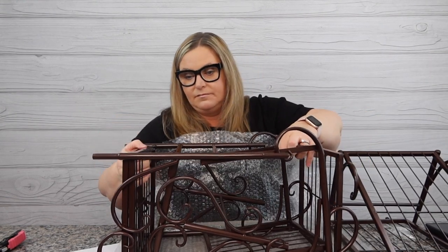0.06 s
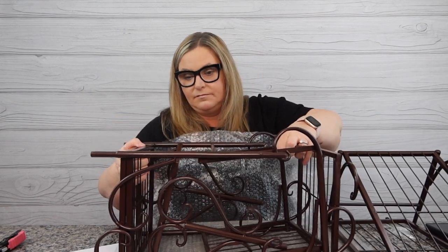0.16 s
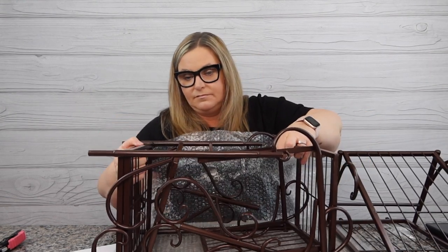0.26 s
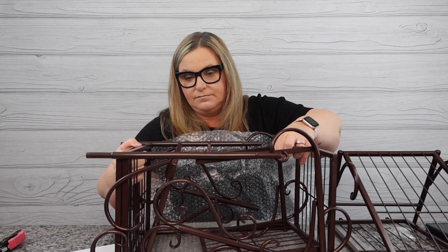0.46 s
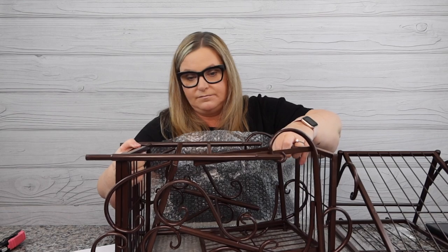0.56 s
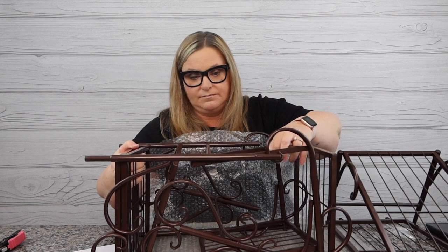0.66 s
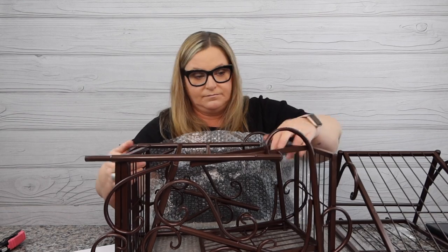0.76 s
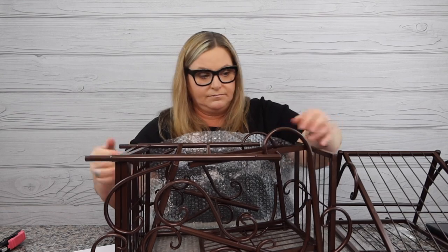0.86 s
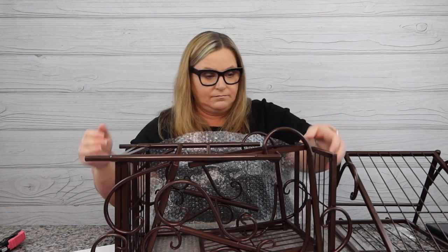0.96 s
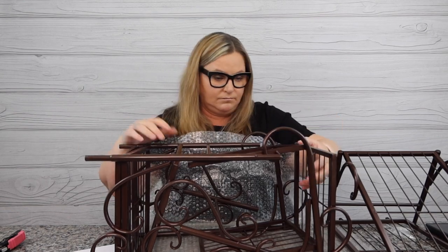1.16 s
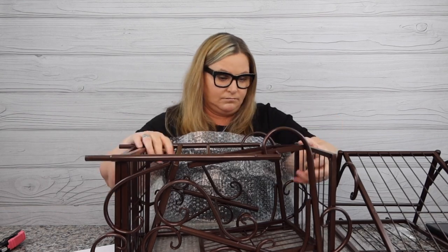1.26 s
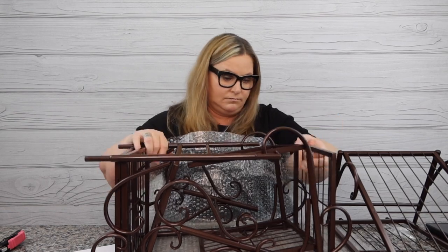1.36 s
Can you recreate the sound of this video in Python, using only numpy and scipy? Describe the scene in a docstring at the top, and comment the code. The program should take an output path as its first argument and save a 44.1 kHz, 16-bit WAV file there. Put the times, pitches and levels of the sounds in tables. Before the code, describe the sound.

A metal stand knocks on a table with two loud, quick clanks at about 0.2 and 0.3 seconds, over a soft thump and faint rustling. Its bars and wire shelves ring and fade by about one second. From 0.5 seconds to the end at 1.4, bubble wrap crinkles quietly with small sharp snaps, while fingers lightly tap the metal and brush the wires. The room sounds small.

```python
"""Two quick metal clanks ring on in a small room, followed by crinkling and ticking.
A welded steel stand is knocked on a table: its bars clank, its wire shelves sing on,
and the table thumps. Then hands shift on the frame, tapping it and brushing its wires,
while tiny creases give way in the bubble wrap inside it."""
import sys
import numpy as np
from scipy import signal
from scipy.fft import rfft, irfft
from scipy.io import wavfile

SR = 44100
rng = np.random.default_rng(int(sys.argv[2]) if len(sys.argv) > 2 else 0)


def inscribe(sig):
    """Save sig as 16-bit PCM at rate SR to the path in sys.argv[1].

    A 1-D sig is mono; a 2-D sig holds one channel per row.
    Samples are clipped to [-1, 1] before scaling.
    """
    pcm = np.round(np.clip(np.atleast_2d(sig).T, -1, 1) * 32767)
    wavfile.write(sys.argv[1], SR, pcm.astype(np.int16))


N = 61739
T = np.arange(N) / SR

# Blows on the frame; the first two merge into one knock. t60 is the time to fade by 60 dB.
# t/s, level/dB, treble limit/Hz, strong tones/dB,
# t60 of the extra fade that cuts a blow's ring short/s, wires/dB
BLOWS = [(0.2212, -12.5, 11700, -5, 0.65, -5.5), (0.2328, -16.5, 8000, -8.5, 0.61, -5.5),
         (0.2708, -8.5, 22000, -5.5, 9, -3)]
# how long the bars ring: f/Hz, t60/s
BAR_RING_TIMES = [(300, 0.4), (900, 0.49), (2300, 0.41), (4500, 0.38), (8000, 0.28), (12000, 0.21),
                  (16000, 0.15)]
BAR_BUILD_UP_CYCLES = 4.7


def amp(db):
    """Turns decibels into a gain."""
    return 10 ** (np.asarray(db) / 20)


def unit(x):
    """Scales a signal to an average power of 1."""
    return x / np.sqrt(np.mean(x ** 2) + 1e-20)


def read(points, hz):
    """Looks up a table on a log-frequency axis."""
    f, value = np.transpose(points)
    return np.interp(np.log(hz + 1), np.log(f + 1), value)


def fade(t60, t=T):
    """Falls by 60 dB every t60 seconds."""
    return np.exp(-np.log(1000) * t / np.maximum(t60, 1e-4))


def add(mix, s, sound):
    """Mixes a sound in at s seconds."""
    part = mix[max(round(s * SR), 0):][:len(sound)]
    part += sound[:len(part)]


def colour(x, points):
    """Gives a sound the listed tone colour, with a filter that keeps white noise equally strong."""
    log_gain = np.log(amp(read(points, abs(np.fft.fftfreq(4096, 1 / SR)))))
    response = np.fft.ifft(np.exp(np.conj(signal.hilbert(log_gain)))).real[:2048]
    return signal.fftconvolve(x, response / np.linalg.norm(response))[:len(x)]


def ring(hz, gain, t60, cycles):
    """Adds up dying tones; each builds up over some cycles, so low ones come late."""
    out = np.zeros(N)
    for f, g, length, phase in zip(hz, gain, t60, rng.random(len(hz))):
        t = T[:int(length * SR)]
        shape = fade(length, t) * (1 - np.exp(-f * t / cycles))
        out[:len(t)] += g * shape * np.sin(2 * np.pi * (f * t + phase))
    return np.sqrt(2) * out


def clicks(events, t60, spectrum, spike_db=-3.5):
    """Each click is a spike and a short burst of noise."""
    out, shape = np.zeros(N), fade(t60, T[:SR // 10])
    size = np.linalg.norm(shape)
    for s, db in events:
        burst = rng.standard_normal(len(shape)) * shape
        burst[0] = amp(spike_db) * size
        add(out, s, amp(db) * burst * size / np.linalg.norm(burst))
    return colour(out, spectrum)


def room_tone():
    """Steady air noise with a low hum."""
    air_colour = [(15, -43), (25, -1.5), (80, -2.5), (123, -0.5), (263, -2), (591, -10.5), (863, -2.5),
                  (1020, -14.5), (2280, -11.5), (8360, -20), (10100, -21), (14800, -22), (16000, -29)]  # air noise: f/Hz, relative level/dB
    hum_tones = [(81.5, -58.5), (179, -64), (250, -63.5)]  # hum: f/Hz, level/dB
    hum = sum(amp(db) * np.sin(2 * np.pi * (hz * T + rng.random())) for hz, db in hum_tones)
    air_gain = amp(read(air_colour, np.fft.rfftfreq(N, 1 / SR)))
    air = irfft(rfft(rng.standard_normal(N)) * air_gain, N)
    return np.sqrt(2) * hum + amp(-49.5) * unit(air)


def scuff():
    """The frame rubs on the table: a puff of dull noise."""
    scuff_colour = [(80, 2), (300, -11), (900, -2.5), (1900, -9.5), (4000, -12.5), (16000, -35)]  # rubbing noise: f/Hz, relative level/dB
    return amp(-36) * colour(rng.standard_normal(N) * fade(t60=0.26), scuff_colour)


def wrap_crinkle(creases_per_s=6000, spread_db=4.5):
    """Thousands of tiny creases give way as the wrap is pressed."""
    loudness = [(0, -44), (.035, -49), (.07, -44), (.09, -43), (.12, -45.5), (.165, -44), (.19, -40.5),
                (.22, -41.5), (.3, -71), (.51, -53), (.585, -44.5), (.603, -43.5), (.635, -41.5),
                (.668, -38), (.70, -54), (.74, -44), (.82, -56), (.89, -45.5), (.95, -55.5), (1.05, -54.5),
                (1.09, -48.5), (1.13, -41), (1.18, -49.5), (1.25, -42.5), (1.30, -49.5), (1.36, -44),
                (1.4, -47)]  # crinkling over time: t/s, level/dB
    crease_colour = [(100, -12.5), (500, -4.5), (1200, -5), (2200, -1), (4000, 0), (6500, -0.5),
                     (8800, 0.5), (10500, -9.5), (13500, -7), (16000, -13.5)]  # sound of a crease: f/Hz, relative level/dB
    size = amp(spread_db * np.minimum(rng.exponential(1, N), 5))
    creases = size * rng.choice([-1, 1], N) * (rng.random(N) < creases_per_s / SR)
    return colour(unit(creases) * amp(np.interp(T, *np.transpose(loudness))), crease_colour)


def table_thumps():
    """The table top booms under the frame."""
    thumps = [(0.001, -43), (0.268, -43.5), (0.286, -35.5)]  # bumps on the table: t/s, level/dB
    table_tones = [(71, -9.5, 0.37), (124.3, 2, 0.12), (173.7, -2.5, 0.18), (255.3, 0, 0.17),
                   (284, -5.5, 0.21)]  # the table's own tones: f/Hz, relative level/dB, t60/s
    hz, db, t60 = np.transpose(table_tones)
    out = np.zeros(N)
    for s, level in thumps:
        add(out, s, amp(level) * ring(hz, amp(db), t60, cycles=1.43))
    return out


def wrap_snaps():
    """Now and then the wrap snaps sharply."""
    snaps = [(.0512, -32), (.0856, -24), (.2007, -32), (.5366, -18), (.5518, -24), (.5895, -30),
             (.6260, -31), (.6460, -33), (.6580, -23), (.6642, -23.5), (.6720, -24), (.7240, -26.5),
             (.8925, -32), (1.1155, -26), (1.2128, -24), (1.2520, -31), (1.3455, -31), (1.3505, -31.5)]  # single snaps: t/s, level/dB
    snap_colour = [(100, -14), (1500, -14), (3500, -1.5), (6000, 1), (9000, -3), (10500, -13.5),
                   (16000, -13)]  # sound of a snap: f/Hz, relative level/dB
    return clicks(snaps, t60=0.0037, spectrum=snap_colour)


def bar_clash(hz, gain, size=32768, groups=16):
    """Hundreds of weak bar tones ring at once; neighbours in pitch swell and fade together."""
    t, out = T[:size], np.zeros(size)
    tones = gain * np.exp(2j * np.pi * rng.random(len(hz))) * size / np.sqrt(2)
    for group in np.array_split(np.arange(len(hz)), groups):
        spectrum, centre = np.zeros(size // 2 + 1, complex), hz[group].mean()
        spectrum[np.round(hz[group] * size / SR).astype(int)] = tones[group]
        build_up = 1 - np.exp(-centre * t / BAR_BUILD_UP_CYCLES)
        out += irfft(spectrum) * fade(read(BAR_RING_TIMES, centre), t) * build_up
    return np.pad(out, (0, N - size))


def frame_clank(count=720, attack_s=0.00053):
    """Each blow cracks, then rings the same bar tones; a harder contact is brighter."""
    strong_tones = [(1797, -10), (1882, -8), (2240, -4), (2353, -4), (2489, 0), (2633, -3), (2750, -2),
                    (2969, -4), (3052, -4), (3432, -3), (4025, -5), (4533, -4), (4814, -4), (5307, -3),
                    (5830, 0), (7903, -4), (8495, -4)]  # the bars' strongest tones: f/Hz, relative level/dB
    clash_colour = [(250, -33), (340, -33), (440, -12.5), (600, -15.5), (850, -9), (1100, -13.5),
                    (1700, -10), (2400, -1.5), (3000, -4.5), (3800, -4.5), (5200, -3.5), (6200, -6.5),
                    (8000, -4), (10000, -10), (13200, -8), (16000, -13)]  # their crowd of weaker tones: f/Hz, relative level/dB
    crack_colour = [(200, -19.5), (700, -20.5), (1500, -8.5), (2500, 3.5), (5000, -2.5), (8500, 1),
                    (10500, -10.5), (14000, 2.5), (16000, -2.5)]  # the crack of contact: f/Hz, relative level/dB
    hz = np.interp(np.arange(count) + rng.random(count), [0, count], np.sqrt([300, 16000])) ** 2
    weight = amp(read(clash_colour, hz)) * hz ** .25  # makes up for wider gaps between high tones
    weight /= np.linalg.norm(weight)
    bar_hz, bar_db = np.transpose(strong_tones)
    out = np.zeros(N)
    for s, db, limit_hz, strong_db, damping_t60, _ in BLOWS:
        soften = lambda f: 1 / np.sqrt(1 + (f / limit_hz) ** 4)
        clash = bar_clash(hz, weight * soften(hz) * unit(rng.uniform(0.59, 1.7, count)))
        softened = [(f, level + 20 * np.log10(soften(f))) for f, level in crack_colour]
        crack = amp(3) * colour(rng.standard_normal(N) * fade(t60=0.044), softened)
        bar_gain = amp(bar_db + strong_db - 20.5) * soften(bar_hz)
        bars = ring(bar_hz, bar_gain, read(BAR_RING_TIMES, bar_hz), BAR_BUILD_UP_CYCLES)
        shape = np.minimum(T / attack_s, 1) * fade(damping_t60)
        add(out, s, (amp(db) * (clash + crack) + bars) * shape)
    return out


def shelf_wires(count=7):
    """Wires of almost equal length take up the blows; their close pitches make the sound waver."""
    # groups of wires: centre/Hz, spread/Hz, level/dB, t60/s, build-up/s
    wire_groups = [(781, 13.4, -49.5, 2.1, .03), (861, 28, -45, 2.14, 0.017),
                   (2226, 55, -30.5, 0.85, 0.016), (2336, 45, -34.5, 1.1, .02),
                   (4680, 130, -30.5, 0.84, 0.034)]
    out = np.zeros(N)
    for centre, spread, db, t60, rise in wire_groups:
        hz = centre + spread * (2 * (np.arange(count) + rng.random(count)) / count - 1)
        for s, *_, wire_db in BLOWS:
            gain = np.full(count, amp(db + wire_db) / np.sqrt(count))
            add(out, s, ring(hz, gain, np.full(count, t60), cycles=rise * centre))
    return out


def wire_brushes():
    """Fingers brush single shelf wires, which ring softly."""
    brushes = [(.565, 883, -50), (.632, 801, -47), (.80, 862, -52), (.965, 870, -55.5)]  # touches on a wire: t/s, f/Hz, level/dB
    out = np.zeros(N)
    for s, hz, db in brushes:
        add(out, s, ring([hz], [amp(db)], t60=[.65], cycles=6.6))
    return out


def finger_taps():
    """Fingers land on the frame with short ticks."""
    taps = [(.5742, -35.5), (.5785, -32.5), (.5830, -36), (.7915, -40), (.9735, -34), (1.3138, -27),
            (1.384, -36.5)]  # single taps: t/s, level/dB
    tap_colour = [(100, -4), (300, -4), (550, -8), (850, 3.5), (1250, 3.5), (1800, -5), (3000, -2.5),
                  (6000, -6), (9000, -4.5), (11000, -16), (16000, -17)]  # sound of a tap: f/Hz, relative level/dB
    return clicks(taps, t60=0.02, spectrum=tap_colour)


def arm_lean(start_s=1.125, length_s=.11, hz=49):
    """The table gives under an arm with one faint, deep swell."""
    swell = np.sin(np.pi * np.minimum(T / length_s, 1) ** .7)
    out = np.zeros(N)
    add(out, start_s, amp(-51) * np.sqrt(2) * swell * np.sin(2 * np.pi * hz * T))
    return out


def room_echo(x):
    """The small room's echoes blur into a tail that dulls as it dies."""
    echo_times = [(100, 0.42), (1000, 0.29), (5000, 0.2), (16000, 0.18)]  # how long the room rings: f/Hz, t60/s
    hz, t, bands = signal.stft(rng.standard_normal(N) * (T > .005), SR, nperseg=256)
    tail = signal.istft(bands * fade(read(echo_times, hz)[:, None], t), SR, nperseg=256)[1]
    return signal.fftconvolve(x, tail / np.linalg.norm(tail))[:N]


def scene():
    """Mixes the stand, the handling noises, the table and the room into one channel."""
    clank = frame_clank()
    handling = wrap_crinkle() + wrap_snaps() + finger_taps()
    add(handling, .0019, amp(-18.5) * handling)  # one nearby reflection
    wires = shelf_wires() + wire_brushes()
    table = table_thumps() + scuff() + arm_lean()
    echo = room_echo(amp(-9) * clank + amp(-10.5) * handling)
    return (clank + wires + handling + table + echo + room_tone())[None]


def record(dry, ceiling=1.03, top_hz=15850):
    """Rounds off the loudest peaks, then cuts the highest treble."""
    rounded = dry / (1 + (dry / ceiling) ** 8) ** (1 / 8)
    low_pass = signal.firwin(511, top_hz, window=("kaiser", 9), fs=SR)
    return signal.oaconvolve(rounded, low_pass[None], "same")


dry = scene()
out = record(dry)
inscribe(out)
```